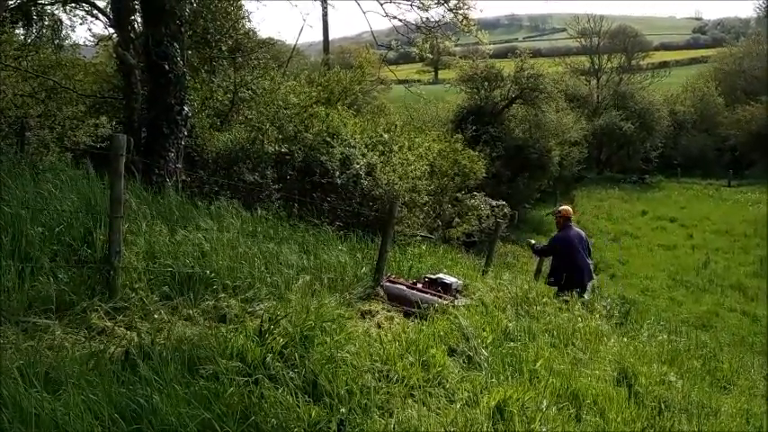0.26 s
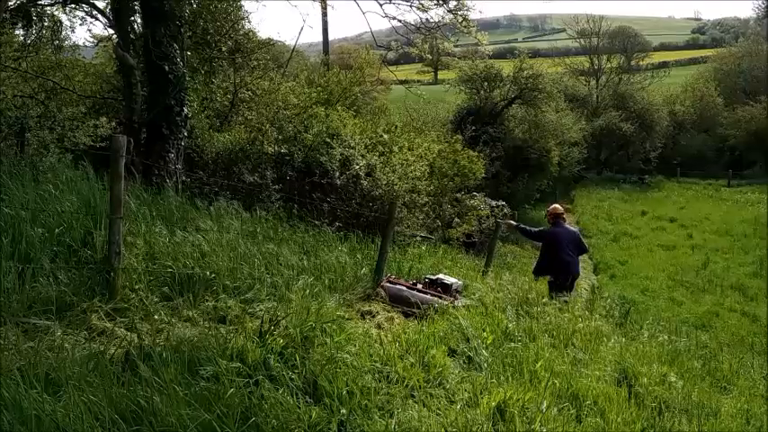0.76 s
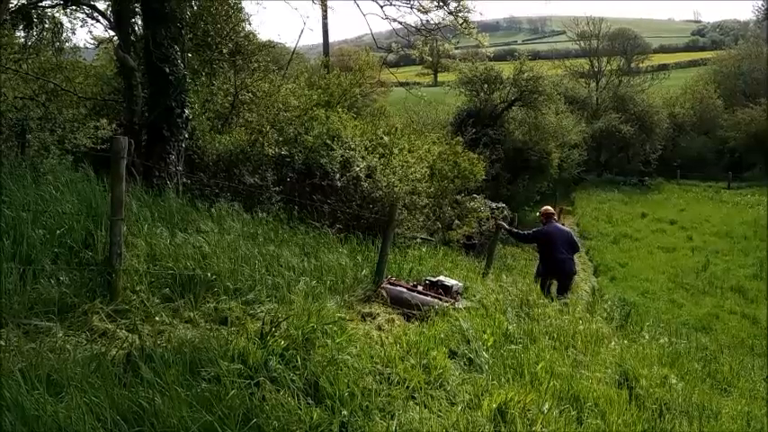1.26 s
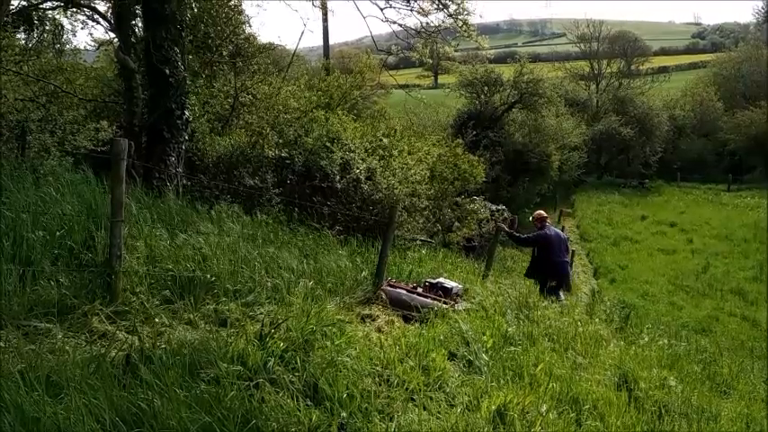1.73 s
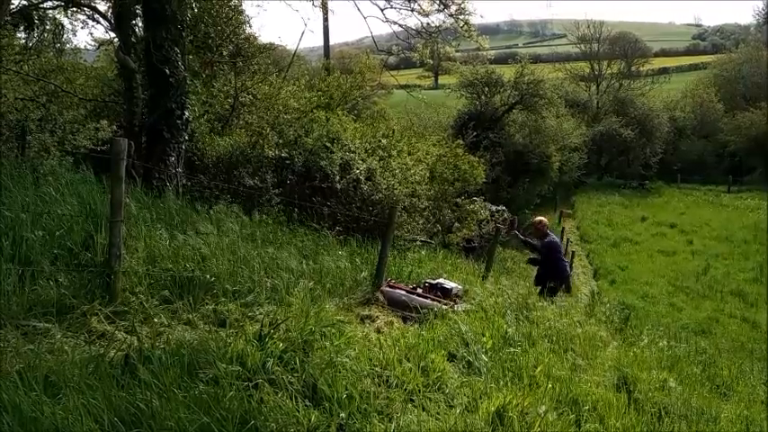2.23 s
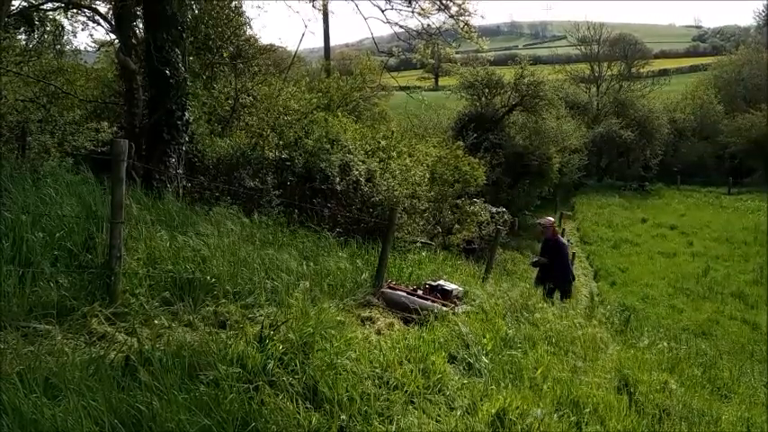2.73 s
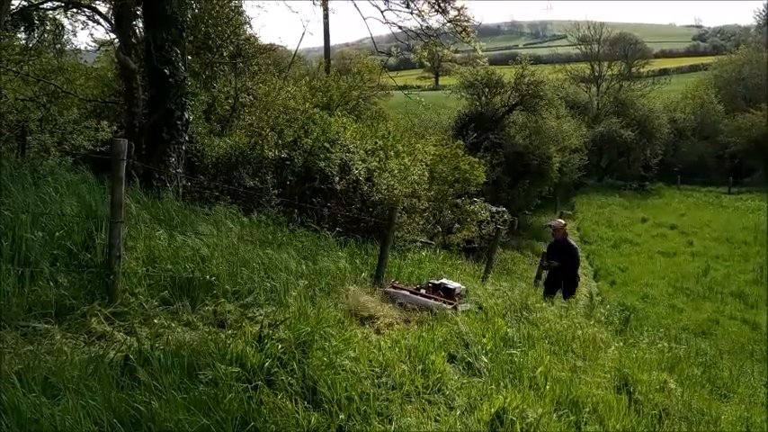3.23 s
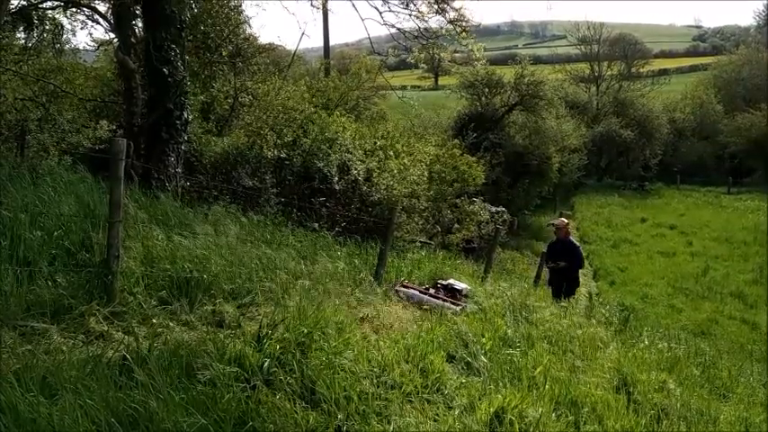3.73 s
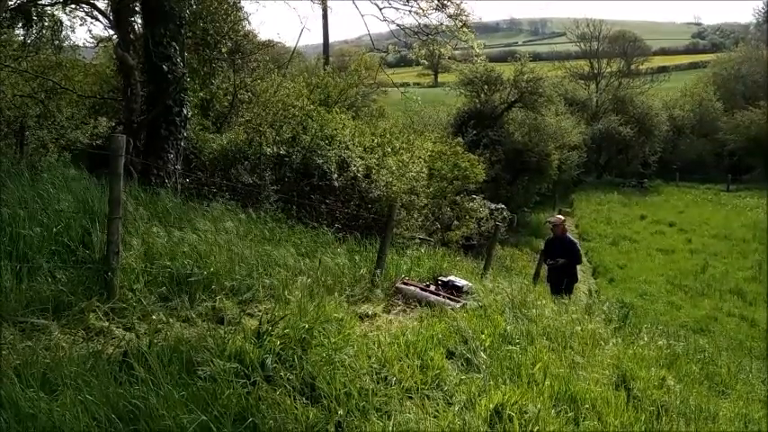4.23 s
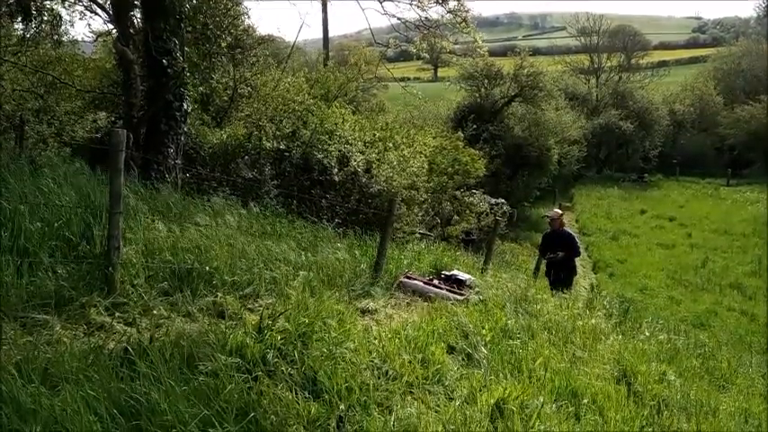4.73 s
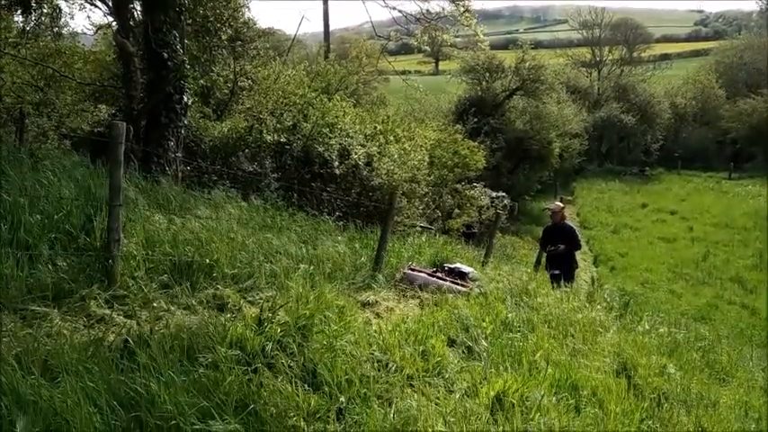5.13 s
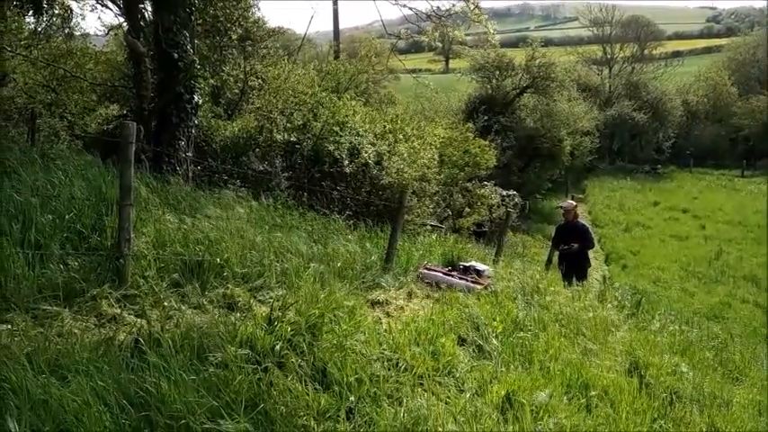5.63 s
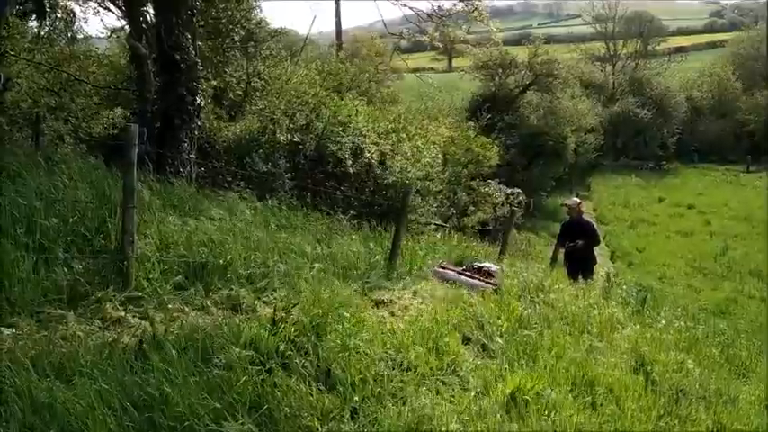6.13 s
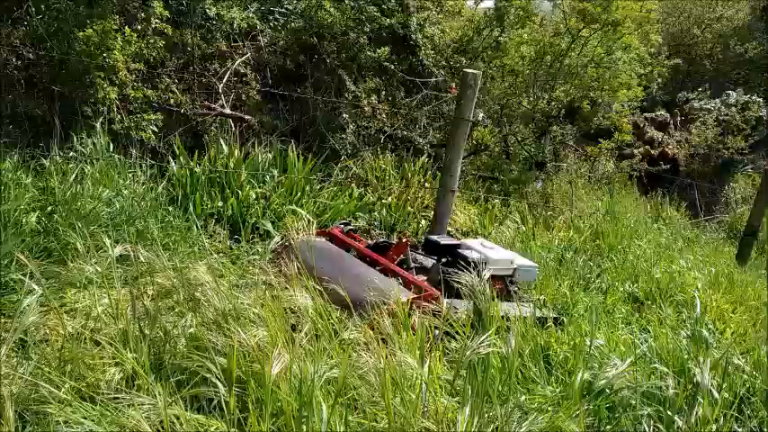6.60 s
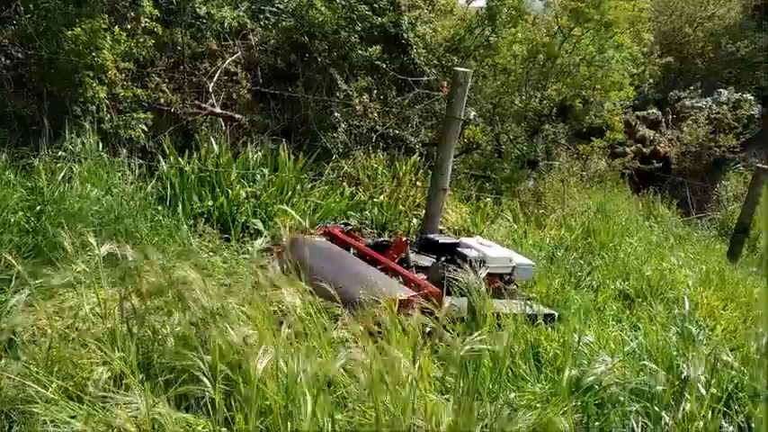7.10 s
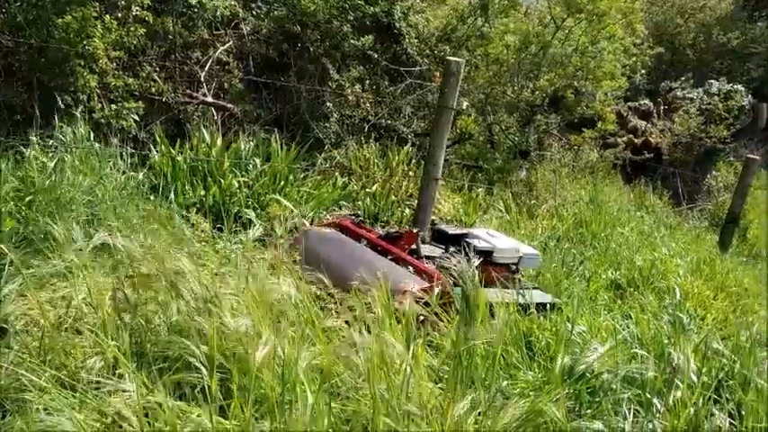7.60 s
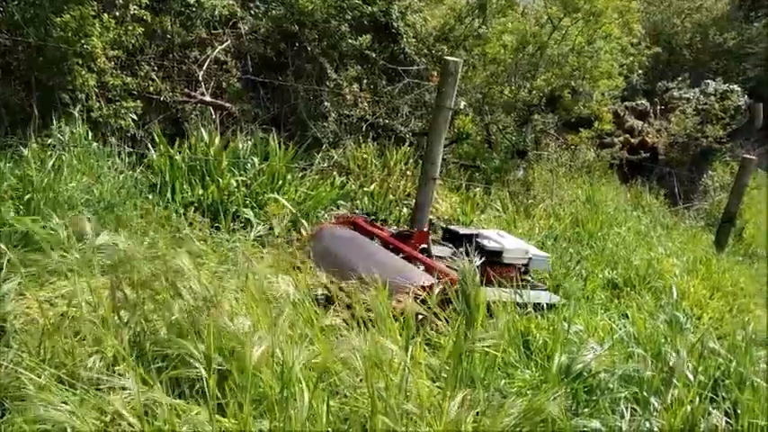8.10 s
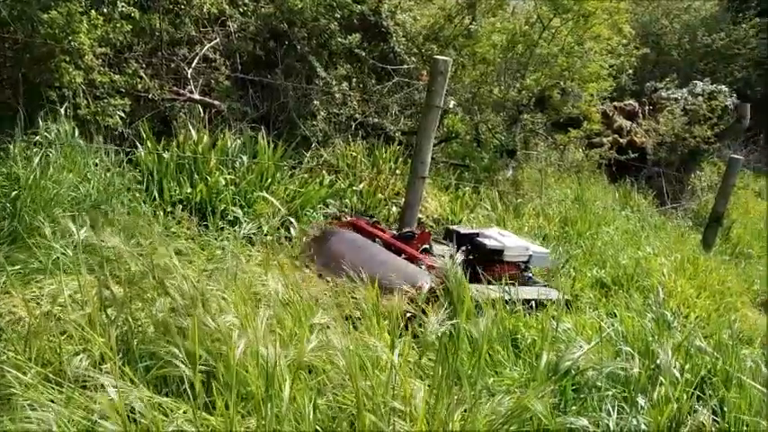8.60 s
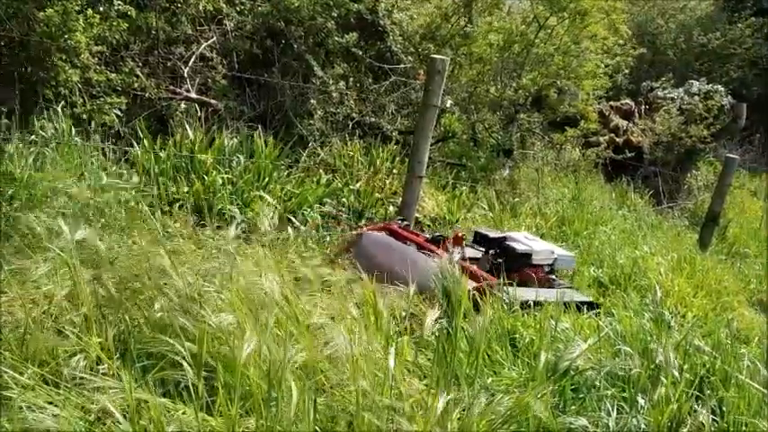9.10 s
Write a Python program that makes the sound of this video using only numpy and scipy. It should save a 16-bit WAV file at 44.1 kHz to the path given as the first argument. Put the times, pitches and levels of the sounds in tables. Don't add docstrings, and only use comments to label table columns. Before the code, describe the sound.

Rapid puttering of a four-stroke flail mower outdoors, straining and surging in tall grass, first from afar, then closer after a brief cut.

```python
import sys
import numpy as np
from scipy import signal
from scipy.fft import rfft, irfft
from scipy.io import wavfile
from scipy.ndimage import uniform_filter1d

SR = 44100
rng = np.random.default_rng(int(sys.argv[2]) if len(sys.argv) > 2 else 0)


def master(y):
    cut = np.clip(np.atleast_2d(y).T, -1, 1)
    pcm = np.round(cut * 32767)
    wavfile.write(sys.argv[1], SR, pcm.astype(np.int16))


def elevation(decibels):
    levels = np.asarray(decibels, float)
    return 10 ** (levels / 20)


N = 412335
CHANGE_S = 6.66
MOVES_OFF_S = 3.28


def curves(rows):
    s, *columns = np.transpose(rows)
    return [np.interp(np.arange(N) / SR, s, c) for c in columns]


def across(rows):
    hz, *columns = np.transpose(rows)
    bins_hz = np.arange(N // 2 + 1) * SR / N
    return [np.interp(np.log(bins_hz + 1), np.log(hz), c) for c in columns]


def colour(x, *views):
    shaped = [irfft(rfft(x) * elevation(across(rows)[0]), N) for rows in views]
    shaped = [v / np.std(v) * np.std(x) for v in shaped]
    return np.where(np.arange(N) < CHANGE_S * SR, shaped[0], shaped[-1])


def walk(rate):
    hold = int(SR / rate)
    held = np.repeat(rng.standard_normal(N // hold + 1), hold)
    return 1.45 * uniform_filter1d(uniform_filter1d(held, hold), hold)[:N]


def follow(rule):
    # t/s, throttle opening/0-1, grass feeding under the deck/0-1
    load = [(0, 0.07, 0.56), (2.9, 0.11, 0.51), (3.15, 0.5, 1), (3.4, 1, 0.56), (4.3, 0.86, 0.38),
            (4.6, 0.67, 0.76), (4.9, .7, 0.34), (5.3, .35, 0.58), (5.85, 0.35, 0.92), (6.15, 0.82, 0.85),
            (6.4, 0.86, 0.28), (7.0, 0.39, 0.58), (7.5, 0.5, 0.82), (8.0, 0.58, 0.39), (8.5, 0.48, 0.5),
            (8.75, 0.46, 0.92), (8.95, 0.78, 0), (9.35, 0.62, -.3)]
    throttle, grass = curves(load)
    t = np.arange(N) / SR
    moving = np.clip((t - MOVES_OFF_S) / 0.36 + .5, 0, 1)
    far_db = rule[0] + moving * (rule[1] - rule[0])
    return np.where(t < CHANGE_S, far_db, rule[2]) + rule[3] * throttle + rule[4] * grass


def crank():
    # t/s, firing rate f/Hz
    speed = [(0.0, 34.622), (2.987, 34.636), (3.354, 33.114), (3.837, 32.739), (4.173, 33.621),
             (4.896, 33.632), (5.016, 33.983), (5.378, 34.106), (6.302, 33.252), (6.697, 33.859),
             (6.716, 34.431), (7.305, 34.478), (7.738, 33.805), (7.886, 34.062), (8.681, 34.247),
             (8.933, 32.063), (9.091, 33.018), (9.35, 33.954)]
    return .095 + np.cumsum(curves(speed)[0]) / SR


def burst(turns, at, rise, fall, scatter_db, late):
    cycle = np.floor(turns - at + .3).astype(int)
    chance = rng.standard_normal((cycle.max() + 9, 2))[cycle + 2]
    u = np.maximum(turns - at - cycle + late * chance[:, 0], 0)
    return elevation(scatter_db * chance[:, 1]) * (1 - np.exp(-(u / rise) ** 2)) * np.exp(-u / fall)


def exhaust(turns):
    # multiple of the firing rate, level/dB
    orders = [(1, -7), (2, -2.5), (3, -7), (4, -6), (5, 0.5), (6, -2.5), (7, -9.5), (8, -11.5), (9, -15.5),
              (10, -20.5), (11, -26.5)]
    exhaust_rule = (-21.5, -23, -23.5, 0.5, 1.5)
    dull_rule = (.6, 1.52, -0.093, -2.33, 0.22)
    chamber_rule = (4, -1.5, -2.5, 8.5, -8)
    dull_db, chamber_db = follow(dull_rule), follow(chamber_rule)
    out = 0
    for k, db in orders:
        back = np.angle(1 - .8 * np.exp(-2j * np.pi * k * .27))
        shift_db = 3 * dull_db * np.exp(-((k - 7) / 1.6) ** 2)
        shift_db = shift_db + chamber_db * np.exp(-((k - 9.6) / 1.2) ** 2)
        wobble_db = .8 * walk(12) + .07 * k * walk(20)
        out = out + elevation(db + shift_db + wobble_db) * np.cos(2 * np.pi * k * turns + 2.1 + back)
    rms = np.sqrt(np.sum(elevation(np.array(orders)[:, 1]) ** 2) / 2)
    return elevation(follow(exhaust_rule)) * out / rms


def spit(turns, views, fall, tail_db, tail_name_fall=0.14):
    puff = burst(turns, -.12, 0.053, fall, 1.1, 0.013)
    tail = burst(turns, -0.059, 0.04, tail_name_fall, 3.55, 0.045)
    ragged = elevation(1.6 * walk(1200))
    return colour(ragged * (puff + elevation(tail_db) * tail) * rng.standard_normal(N), *views)


def spits(turns, body_db):
    # f/Hz, density level/dB
    gas_spectra = [
        [(2800, -16), (3400, 1), (4200, -3), (5200, 0), (6500, -0.5), (7700, 2), (8800, 4.5), (10000, -2), (11500, -4.5), (13500, -8), (15500, -17)],
        [(2800, -8.5), (3400, 0), (4200, -6), (5200, -1.5), (6500, 0.5), (7700, 3), (8800, 8), (10000, 5.5), (11500, -2.5), (13500, -3.5), (15500, -10)],
    ]
    # f/Hz, density level/dB
    body_spectra = [
        [(250, 0), (430, -15), (600, -21.5), (800, -6), (1000, -13.5), (1250, -9.5), (1550, 3), (1900, -5), (2250, 0), (2600, -7.5), (2950, 0.5), (3400, -14), (4200, -20.5)],
        [(250, 11), (430, -24), (600, -3), (800, -3), (1000, -14), (1250, -1.5), (1550, -15), (1900, 5), (2250, 0), (2600, 0.5), (2950, -17), (3400, -17), (4200, -15.5)],
    ]
    gas_rule = (-21.5, -20, -16, 5.5, -1.5)
    hiss = elevation(follow(gas_rule) + 12) * spit(turns, gas_spectra, 0.059, -12.0)
    return hiss + elevation(body_db + 11) * spit(turns, body_spectra, 0.062, -11)


def knocks(turns, body_db, deck_db):
    # f/Hz, bandwidth/Hz, level/dB
    casing = [(626, 56, 3), (693, 52, -0.5), (1138, 91, -2), (1384, 104, 2), (2100, 150, -4)]
    blows = burst(turns, -0.0742, 0.0034, 0.005, 3.2, 0.0041)
    blows = blows - elevation(-3.0) * burst(turns, .19, 0.0028, 0.0039, 0.72, 0.0038)
    out = 0
    for hz, bandwidth, db in casing:
        out = out + elevation(db) * signal.lfilter(*signal.iirpeak(hz, hz / bandwidth, SR), blows)
    out = signal.sosfilt(signal.butter(4, 510, "high", fs=SR, output="sos"), out)
    return elevation(0.55 * deck_db + 0.42 * body_db - 10.0) * out / np.std(out)


def gears(turns, strain):
    # multiple of the firing rate, far level/dB, near level/dB
    teeth = [(14, -97, -48), (15.81, -60, -43.5), (17.9, -51, -43), (20, -57, -43.5), (20.85, -62.5, -47.5),
             (25.82, -48.5, -61), (29, -56, -45), (30, -46.5, -48), (38.85, -49.5, -45.5),
             (44.3, -43, -49.5), (48.3, -44.5, -68)]
    gear_rule = (5, -1, 3, -2.5, 2.5)
    out, near = 0, np.arange(N) > CHANGE_S * SR
    for k, far_db, near_db in teeth:
        shake = .03 * max(k - 21, 3) * strain * walk(30)
        tone = np.cos(2 * np.pi * (k * turns + shake + rng.random()))
        out = out + elevation(np.where(near, near_db, far_db) - 1 + walk(5)) * tone
    return elevation(follow(gear_rule)) * out * (1 + 0.39 * np.cos(2 * np.pi * turns))


def flail_rotor(turns):
    # t/s, f/Hz
    beat = [(0, 4.65), (3.27, 4.65), (3.5, 1.75), (4.65, 1.75), (4.8, 3.33), (5.95, 3.33), (6.05, 1.44),
            (6.88, 1.44), (6.92, 4.55), (7.8, 3.3), (8.4, 4.4), (9.35, 2.6)]
    rotor_rule = (-27, -30.5, -28, -11.5, -0.5)
    octave_rule = (-52, -44, -45.5, 3, 0)
    gained = .33 + np.cumsum(curves(beat)[0]) / SR
    phase = 2 * np.pi * (5 * turns + gained)
    flails = np.sqrt(2) * elevation(follow(rotor_rule) + .8 * walk(10)) * np.cos(phase)
    return flails + elevation(follow(octave_rule)) * np.cos(2 * phase)


def shredding(turns, views, tick_db):
    ticks = burst(turns, .6, .006, 0.018, 4.0, 0.022)
    ticks = ticks + 0.93 * burst(turns, .65, 0.0069, 0.043, 2.2, 0.011)
    patchy = elevation(1.26 * walk(600) + 1.2 * walk(90) + 0.91 * walk(20))
    return colour((patchy + elevation(tick_db) * ticks) * rng.standard_normal(N), *views)


def cutting(turns, deck_db):
    # f/Hz, density level/dB
    stalks = [(2800, -27), (3400, -11), (4200, -14.5), (5200, -11), (6500, -11), (7700, -7), (8800, -3.5),
              (10000, -7.5), (11500, -12.5), (13500, -13), (15500, -25)]
    # f/Hz, density level/dB
    deck_spectra = [
        [(250, -3), (430, -15.5), (600, -11), (800, -11), (1000, -13), (1250, -16.5), (1550, -9), (1900, -13.5), (2250, -9), (2600, -17), (2950, -9), (3400, -29.5), (4200, -23.5)],
        [(250, -4), (430, -15), (600, -6.5), (800, -9.5), (1000, -12.5), (1250, -14.5), (1550, -15), (1900, -13.5), (2250, -14.5), (2600, -11.5), (2950, -14), (3400, -22), (4200, -63)],
    ]
    shred_rule = (-29.5, -29, -27.5, 1.5, 8.5)
    crisp = elevation(follow(shred_rule) - 3.0) * shredding(turns, [stalks], 3.1)
    return crisp + elevation(deck_db + 0.5) * shredding(turns, deck_spectra, 4.0)


def clods():
    # t/s, peak level/dB, f/Hz, decay/s
    thrown = [
        (3.124, -33, 700, 0.023),
        (4.202, -28.5, 380, 0.023),
        (4.687, -27, 646, 0.021),
        (7.65, -29, 610, 0.033),
        (8.839, -24, 677, 0.011),
    ]
    out, t = np.zeros(N), np.arange(8000) / SR
    for s, peak_db, hz, length in thrown:
        noise = rng.standard_normal(len(t))
        rustle = signal.lfilter(*signal.iirpeak(hz, 2.5, SR), noise)
        rustle = rustle * (1 - np.exp(-t / 0.0081)) * np.exp(-t / length)
        tick = elevation(-5) * noise * np.exp(-t / 0.0024)
        out[int(s * SR):int(s * SR) + len(t)] += elevation(peak_db + 22.5) * (rustle + tick)
    return out


def covered_port(tones, flails, noise):
    # f/Hz, level/dB, coherence/0-1
    cover = [(30, -22, 1), (70, -8.5, 0.8), (170, -15, 1), (400, -22, 0.5), (900, -22, 0.8),
             (1640, -23.5, 1), (2060, -12.5, 0.76), (2670, -13, 0.9), (2750, -52, 0.4), (3460, -16, 1),
             (4400, -40.5, .6), (7300, -117, .5), (9500, -85, .6), (12000, -135, .4)]
    # f/Hz, phase/rad
    lag = [(30, -1), (900, -.85), (1800, -.4), (2200, -1.5), (2600, -2.9), (4500, -3.4), (7500, -6.2),
           (12000, -11.4)]
    db, like = across(cover)
    like = np.clip(like, 0, 1)
    stray = np.roll(noise, 4 * SR // 34)
    facing = 0.22 * flails * (np.arange(N) > MOVES_OFF_S * SR)
    leak = rfft(tones + facing) + like * rfft(noise) + np.sqrt(1 - like ** 2) * rfft(stray)
    return irfft(leak * elevation(db) * np.exp(1j * across(lag)[0]), N)


def breeze():
    # covered port level/dB, open port level/dB
    calm_levels = [
        (-38, -34),
        (-33.5, -43),
    ]
    # t/s, length/s, covered port swell/dB, open port swell/dB
    gusts = [(.34, .1, 8, -2), (1.2, .12, 4, 1), (2.1, .15, 9, -2), (2.8, 0.29, 5, 2), (3.9, 1, 10, 8),
             (4.9, 0.91, 7, 1), (5.3, 0.36, 3, 3.5), (6.25, 0.31, 11.5, 4.5), (6.598, 0.051, 29, 1),
             (7.4, .35, 7, 4), (8.4, 0.35, 5, 15), (9.0, 0.18, 6.5, -5)]
    t = np.arange(N) / SR
    calm = np.array(calm_levels)[..., None]
    out = np.where(t < CHANGE_S, calm[0], calm[1]) + 0.65 * np.array([walk(6.4), walk(4.68)])
    for s, length, *swell_db in gusts:
        out = out + np.array(swell_db)[:, None] * np.exp(-((t - s) / length) ** 2)
    return out


def wind():
    # f/Hz, density level/dB
    rumble = [
        [(8, 2.5), (20, 16.5), (45, -28), (90, -31), (200, -15), (400, -33.5), (900, -42), (1500, -112)],
        [(8, -10), (25, -11.5), (50, -1), (90, -8), (200, -13.5), (340, -40), (450, -54), (800, -80)],
    ]
    # t/s, peak level/dB, f/Hz
    slaps = [(3.28, -13, 60.6), (3.349, -31, 59.7), (3.659, -17, 60), (3.761, -13, 60), (3.855, -13, 60.4),
             (4.099, -13, 60), (4.2, -27, 60), (4.3, -15, 61.5), (4.348, -19, 60), (4.999, -22, 60),
             (5.298, -19, 60)]
    buffets = elevation([1.8 * walk(14), 1.8 * walk(14)])
    out = np.array([colour(b * rng.standard_normal(N), rows) for b, rows in zip(buffets, rumble)])
    out = out * elevation(breeze() + 1.5)
    for s, peak_db, hz in slaps:
        u = np.arange(4000) / SR * hz
        slap = np.exp(-((u - .7) / 0.32) ** 2) * np.sin(2 * np.pi * u)
        out[1, int(s * SR):int(s * SR) + len(u)] -= elevation(peak_db + 5.5) * slap
    return out


def scene():
    body_rule = (-24.5, -24, -27.5, 5, -1.5)
    deck_rule = (-33, -33, -32, -2, 3)
    turns = crank()
    body_db, deck_db = follow(body_rule), follow(deck_rule)
    strain = np.clip((body_db - deck_db - 9) / 5, .1, 1)
    flails = flail_rotor(turns)
    tones = exhaust(turns) + flails + gears(turns, strain)
    tones = tones + clods() + knocks(turns, body_db, deck_db)
    puffs = spits(turns, body_db)
    steady = cutting(turns, deck_db)
    left = covered_port(tones, flails, puffs + elevation(-8.5) * steady)
    return np.array([left, tones + puffs + steady]) + wind()


def scene_change():
    gap_start_s, gap_end_s, fade_s = 6.643, 6.675, 0.12
    t = np.arange(N) / SR
    fade_db = -12.5 * np.exp(-(np.maximum(t - gap_end_s, 0) / fade_s) ** 2)
    db = np.where(t < gap_start_s, 0, np.where(t < gap_end_s, -73, fade_db))
    return uniform_filter1d(elevation(db + 0.56), size=150)


def roll_off(x):
    return signal.sosfilt(signal.butter(12, 16190, fs=SR, output="sos"), x)


def record(dry):
    soft = np.tanh(1.3 * dry) / 1.3
    soft = signal.sosfilt(signal.ellip(10, .3, 70, 16000, fs=SR, output="sos"), soft)
    return roll_off(soft * scene_change())


dry = scene()
out = record(dry)
master(out)
```